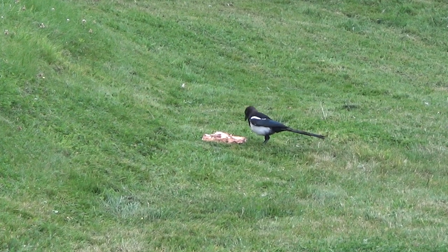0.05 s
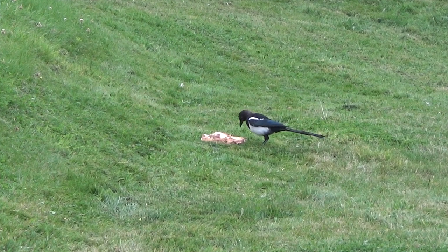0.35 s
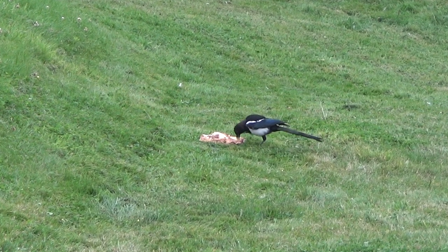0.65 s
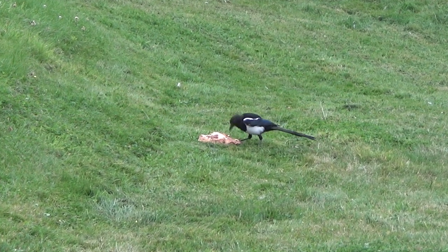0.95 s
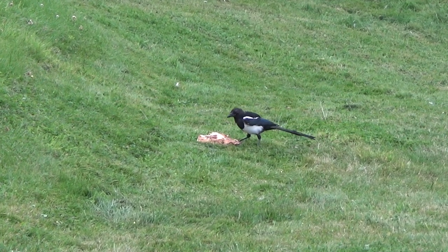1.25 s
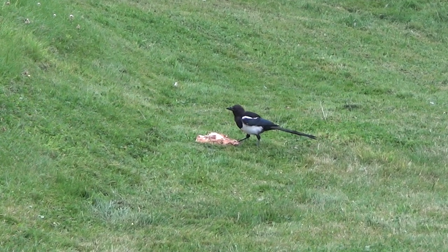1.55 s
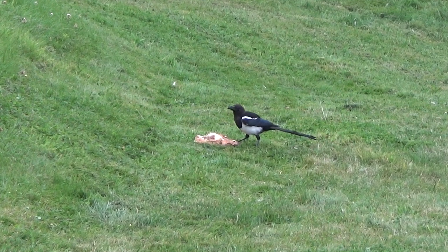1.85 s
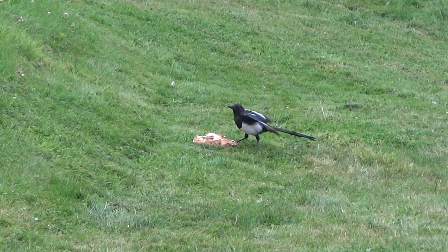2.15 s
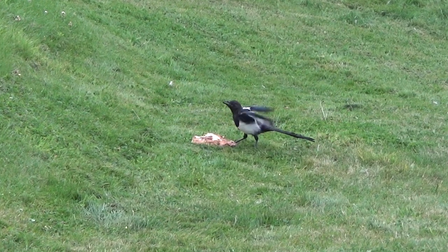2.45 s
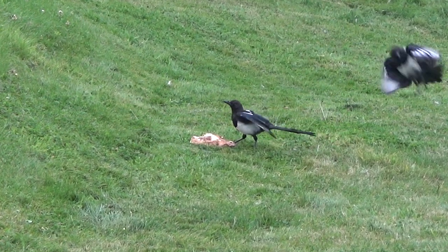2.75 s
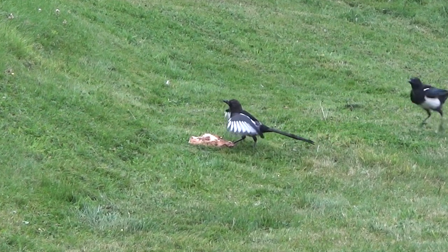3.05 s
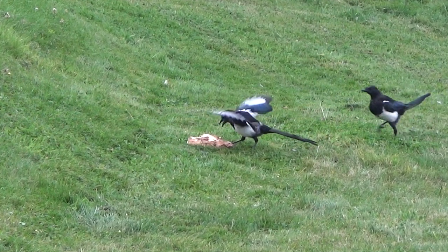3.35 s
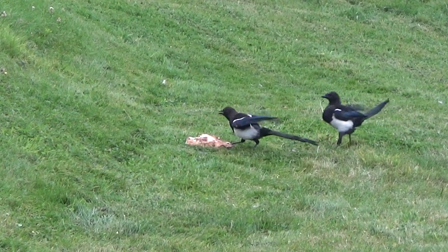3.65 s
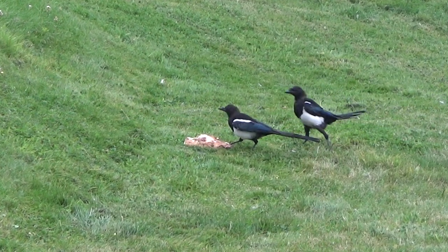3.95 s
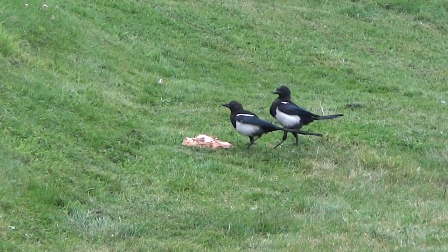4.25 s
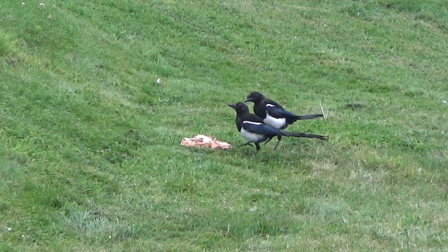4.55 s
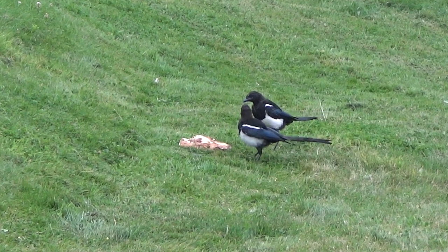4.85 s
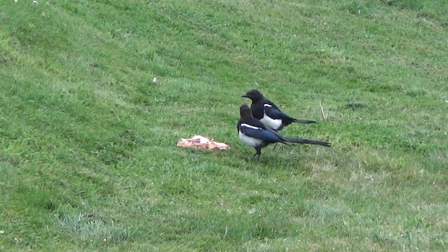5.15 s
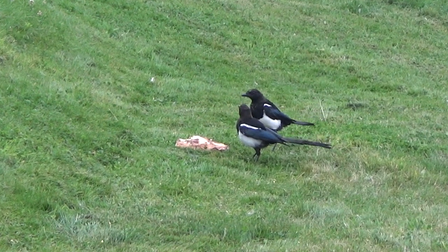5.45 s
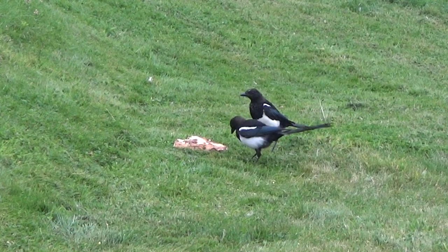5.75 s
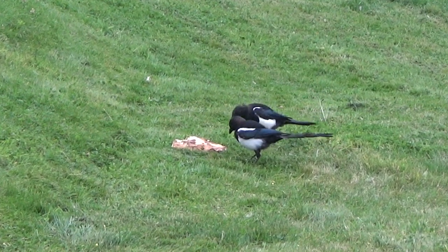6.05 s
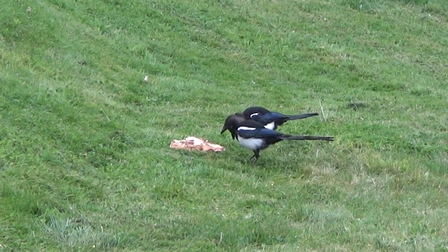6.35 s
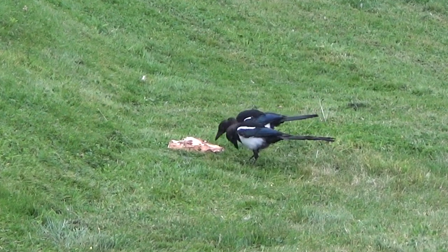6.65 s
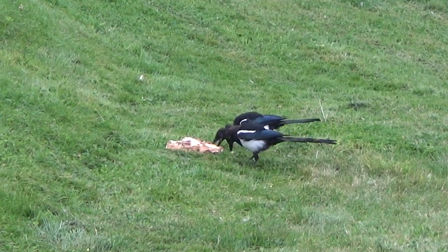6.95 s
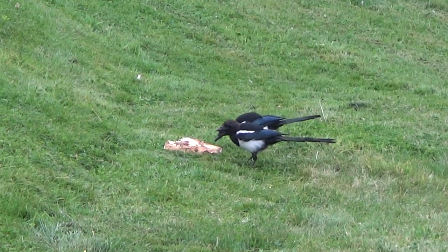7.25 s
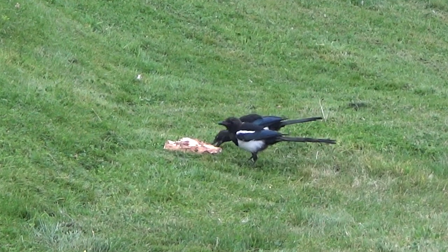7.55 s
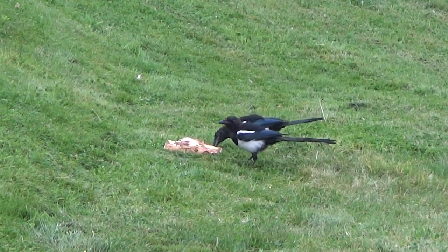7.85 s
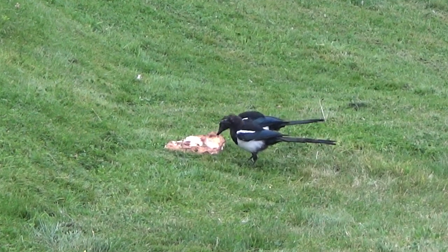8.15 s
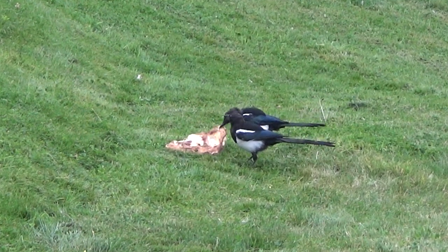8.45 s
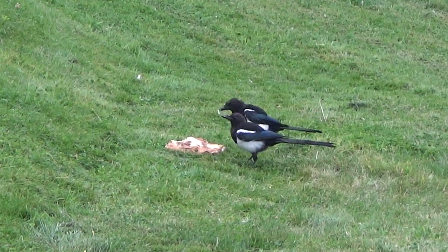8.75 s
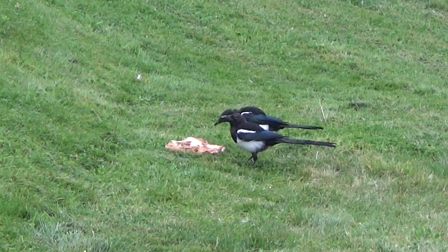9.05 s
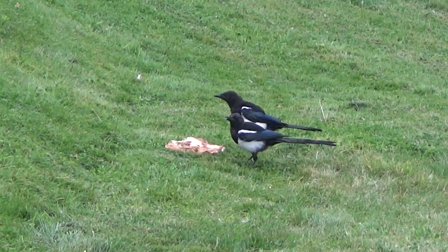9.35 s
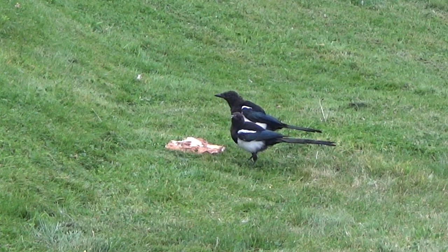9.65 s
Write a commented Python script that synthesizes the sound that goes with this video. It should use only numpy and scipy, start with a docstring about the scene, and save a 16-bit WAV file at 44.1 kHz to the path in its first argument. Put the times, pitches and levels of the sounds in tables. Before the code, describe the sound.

Harsh magpie rattles and hoarse yelps ring briefly off nearby walls, with a far songbird and steady road murmur behind.

```python
"""A lawn close to house walls, where two magpies squabble over food.
Up front are their short rising yelps and two bursts of harsh chatter: the syrinx sings or slaps shut,
throat and bill shape the sound, and it rings briefly between the walls.
Far off, a small songbird trills and whistles, and there is one soft hoot.
Under it all lies a steady bed of distant traffic, with two swells of deep engine drone."""
import sys
import numpy as np
from scipy import signal
from scipy.fft import rfft, irfft
from scipy.io import wavfile

SR = 44100
rng = np.random.default_rng(int(sys.argv[2]) if len(sys.argv) > 2 else 0)


def pcm_store(signal):
    """Save signal as 16-bit PCM."""
    levels = np.round(np.clip(np.atleast_2d(signal), -1, 1) * 32767)
    wavfile.write(sys.argv[1], SR, levels.astype(np.int16).T)


N = 432180
TIME = np.arange(N) / SR

# notes of the chatter: peak_s, level_db
CHATTER_NOTES = [(3.798, -26.3), (3.857, -22.7), (3.936, -22), (4.017, -21), (4.103, -23), (4.196, -23.3),
                 (7.300, -27), (7.363, -23.5), (7.446, -21.5), (7.527, -20.5), (7.603, -21), (7.695, -21.5),
                 (7.787, -19.5), (7.879, -19.5), (8.002, -18.5)]
# bursts of chatter: start_s, opening_low_mid_db
CHATTER_BURSTS = [(3.795, 3.9), (7.3, 1.3)]
# throat and open bill in the chatter: frequency_hz, gain_db
CHATTER_EQ = [(250, -40), (500, -26), (900, -18), (1400, -12.5), (1900, -6), (2400, -5.5), (2900, -0.5),
              (3400, -10.5), (4200, -19), (5000, -15.5), (6000, -6.5), (7100, -9), (9500, -14),
              (11000, -23.5), (15500, -41.5)]
# yelps: start_s, length_s, first_pitch_hz, level_db, fullness (0-1), rasp_db, first_throat_hz
YELP_CUES = [(.652, .078, 570, -25.5, .65, -12, 2200), (.783, .089, 515, -24, .35, -7, 2100),
             (.951, .081, 508, -22.8, .05, -8, 2080), (4.032, .063, 550, -25.7, .92, -5, 2150),
             (4.18, .064, 640, -23.6, .02, -5, 2550), (4.324, .088, 512, -27.2, .95, -6, 1480),
             (9.635, .064, 580, -25, 0.83, -4.5, 1820), (9.751, .09, 522, -27.5, .75, -4.8, 1880)]
# the clear part of a yelp: frequency_hz, gain_db
YELP_TONE_EQ = [(400, -38), (800, -14.5), (1300, -9), (1700, -8.5), (2200, 0.5), (2700, 4.5), (3400, -4),
                (3900, -28), (4800, -19), (7000, -8.5), (8300, -26), (11000, -50)]
# the hoarse part of a yelp: frequency_hz, gain_db
YELP_RASP_EQ = [(400, -28), (900, -20.5), (1600, -14.5), (2300, -1.5), (2900, -2), (3600, -5.5), (4700, 1),
                (6000, -6), (7400, -7.5), (8700, -18.5), (11000, -26), (15500, -41)]
# a thin and a full yelp: odd_harmonics_db, treble_db, low_mid_db
THIN_YELP, FULL_YELP = (-15, -1.8, -4.5), (-1.5, 4.5, 2.8)
# lean of the body of the magpies' sound, left positive: time_s, lean_db
MAGPIE_PAN = [(1, 0.3), (4, -1.4), (7.7, -2), (9.7, .6)]
# hard reflections off the walls: delay_s, gain_db
WALL_ECHOES = [(.0022, -16.5), (.0043, -18.5), (0.0205, -16.5)]
# standing waves between the walls: frequency_hz, gain_db
STANDING_WAVES = [(1151, -3), (1321, -12), (1373, -13), (1439, -17), (1847, -3.5), (2033, -4), (2233, -3),
                  (2346, -2), (2750, -10.5), (2803, -4), (2998, 2), (3207, -10), (5942, -1), (6061, -8),
                  (6401, -15), (6819, -1), (7114, -3)]
# stereo image of the wall scatter and the garden tail: frequency_hz, left_right_likeness
WALL_IMAGE = [(300, -0.046), (1500, 0.7), (3000, 0.8), (5000, 0.85), (9000, 0.52)]
GARDEN_IMAGE = [(500, 0.99), (3000, 0.64), (9000, 0.36)]
# songbird's trills: start_s, length_s, first_pitch_hz, last_pitch_hz, pips_per_s, level_db, fall_db
TRILL_CUES = [(4.474, 0.063, 4950, 4230, 55, -44.5, -4), (4.55, 0.18, 3700, 3250, 50, -45.5, -6),
              (5.986, 0.36, 5450, 3106, 48, -46.5, -8.5)]
# songbird's clearer slurs: start_s, length_s, first_pitch_hz, last_pitch_hz, level_db
SLUR_CUES = [(2.011, .11, 2370, 4330, -59), (2.07, .15, 4400, 2500, -59), (2.92, .066, 2360, 3020, -57),
             (5.368, .027, 4100, 3670, -59), (6.38, 0.055, 3100, 2250, -56), (6.76, .14, 2430, 2720, -61),
             (7.075, 0.042, 3330, 2550, -56), (7.13, .029, 6030, 3940, -50),
             (7.194, .028, 4900, 2690, -52.5), (8.633, 0.039, 2700, 2265, -54),
             (9.408, 0.083, 2650, 3910, -56)]
# raw traffic murmur, and the gentle EQ that warms it: frequency_hz, gain_db
TRAFFIC_SPECTRUM = [(15, -35), (25, -21), (48, -2.5), (178, -7.5), (246, -2), (322, -7), (468, -7.5),
                    (613, -9), (1110, -11), (2060, -16.5), (2550, -18), (3430, -23), (7880, -30.5),
                    (13900, -41.5), (15400, -58.5)]
TRAFFIC_EQ = [(25, -5), (60, -0.4), (110, 3.0), (1100, 0.37), (2200, -1.0), (12000, -1.0)]
# stereo image of the traffic: frequency_hz, left_right_likeness
TRAFFIC_IMAGE = [(60, 0.6), (130, 0.32), (290, -0.19), (640, -0.29), (1410, -0.049), (3100, -0.051),
                 (6810, -0.015), (15000, 0.15)]
# swells of engine drone: start_s, length_s, level_db
DRONE_SWELLS = [(1.65, 1.3, -62.5), (4.75, 0.83, -63)]


def chatter(swell_s=.023, fade_s=.0215, lead_s=.035, attack_s=.01, stretch_per_s=.7, thin_db_per_s=2.5):
    """Magpie notes of rasp swell, then fade as the air runs out; along a burst they lengthen and thin."""
    out, size = np.zeros(N), 8192
    t = (np.arange(size) - size // 2) / SR
    for peak_s, level_db in CHATTER_NOTES:
        burst_s, opening_db = min(CHATTER_BURSTS, key=lambda burst: abs(peak_s - burst[0]))
        note_time = t / (1 + stretch_per_s * (peak_s - burst_s))
        treble_db = 0.13 * (level_db + 19)   # softer notes come from a less open bill
        low_db = opening_db - thin_db_per_s * (peak_s - burst_s)
        pressure = np.exp(-np.abs(note_time / np.where(t < 0, swell_s, fade_s)) ** 1.82)
        pressure *= np.clip((note_time + lead_s) / attack_s, 0, 1)   # the voice catches
        source = colour(rasp(size, slaps_per_s=245, uneven=.33, puff_s=0.006, snap=0.54), CHATTER_EQ)
        bright = bill(source, treble_db, low_db)
        dull = colour(bright, [(3300, 2), (6000, -9.0)])
        voice = dull + pressure * (bright - dull)   # the treble needs full pressure
        add(out, peak_s + t[0], from_db(level_db) * pressure * voice)
    return out


def yelps(top_hz=890, open_throat_hz=3500, jitter=0.024, shimmer_db=1.6, focus_db=5, roughening_db=7):
    """A magpie's fast upward glide splits and turns to rasp; the throat's resonance rises with it."""
    out, size = np.zeros(N), 6000
    for start_s, length_s, first_hz, level_db, fullness, rasp_db, first_throat_hz in YELP_CUES:
        odd_db, treble_db, low_db = THIN_YELP + fullness * np.subtract(FULL_YELP, THIN_YELP)
        along = TIME[:size] / length_s
        risen = np.minimum(along, 1)
        pitch_hz = first_hz * (top_hz / first_hz) ** (risen ** 1.1)
        pitch_hz *= 1 + jitter * risen * wander(1091, size)
        throat_hz = first_throat_hz * (open_throat_hz / first_throat_hz) ** risen
        phase = 2 * np.pi * np.cumsum(pitch_hz) / SR
        tone = 0
        for k in range(1, 13):
            formant_db = focus_db * np.exp(-(np.log(k * pitch_hz / throat_hz) / 0.2) ** 2)
            gain = from_db(odd_db * (k % 2) + formant_db + shimmer_db * wander(515, size))
            tone += gain * np.sin(k * phase + rng.uniform(0, 2 * np.pi))
        tone *= 1 + 0.58 * risen ** 2 * np.sin(phase / 2)   # period doubling splits the partials
        tone = colour(tone, YELP_TONE_EQ)
        grit = colour(rasp(size, slaps_per_s=420, uneven=0.32, puff_s=0.0029, snap=0.35), YELP_RASP_EQ)
        grit = from_db(rasp_db + roughening_db * (risen - .5)) * rms_one(grit)
        source = tone / np.std(tone[along < 1]) + grit
        pressure = np.exp(-((along - 0.56) / 0.42) ** 2) * np.clip(along * 20, 0, 1)
        add(out, start_s, from_db(level_db) * pressure * bill(source, treble_db, low_db))
    return out


def rasp(size, slaps_per_s, uneven, puff_s, snap, spread_db=1.64, limp_db=2.0):
    """The syrinx slaps shut unevenly, strong and weak in turn: each time a click and a puff of air."""
    timing, force = rng.standard_normal((2, 200))
    at = (np.cumsum(np.exp(uneven * timing)) * SR / slaps_per_s).astype(int)
    strength = from_db(spread_db * force - limp_db * (np.arange(len(at)) % 2))
    slaps = np.zeros(size)
    slaps[at[at < size]] = strength[at < size]
    decay = np.exp(-1 / (puff_s * SR))
    puffs = signal.lfilter([np.sqrt(1 - decay ** 2)], [1, -decay], slaps + 1e-18)
    return snap * butter(slaps, 7400, "low") + puffs * rng.standard_normal(size)


def bill(source, treble_db, low_db):
    """A wider bill lets out more treble, a fuller throat more low-mid."""
    eq = [(1800, low_db), (2500, 0.0056), (3300, 0.0049), (5000, 0.76 * treble_db), (8500, 1.06 * treble_db)]
    return colour(rms_one(source), eq)


def walls(x):
    """Nearby walls add hard echoes, dense early scatter and ringing standing waves."""
    x = x + sum(from_db(db) * np.interp(TIME - delay_s, TIME, x, left=0) for delay_s, db in WALL_ECHOES)
    early = scatter(x, t60_s=0.22, image=WALL_IMAGE, dull_hz=13200, build_s=0.00056)
    x = from_db(-4.5) * x + from_db(-12.0) * early
    return x + sum(from_db(db) * resonance(x, hz, width_hz=11.6) for hz, db in STANDING_WAVES)


def trills(sag=3.2, pip_s=0.0053, pip_sweep=0.12, uneven_db=2.5):
    """The songbird's runs of tiny down-swept pips, sinking in pitch and level."""
    out = np.zeros(N)
    for start_s, length_s, first_hz, last_hz, pips_per_s, level_db, fall_db in TRILL_CUES:
        for delay_s in np.arange(0, length_s, 1 / pips_per_s):
            height = np.exp(-sag * delay_s / length_s)
            hz = (last_hz + (first_hz - last_hz) * height) * rng.normal(1, 0.027)
            sweep = 1.02 + pip_sweep * height
            gain = from_db(level_db + fall_db * delay_s / length_s + uneven_db * rng.normal())
            add(out, start_s + delay_s, gain * whistle(pip_s, hz * sweep, hz / sweep, waver=0.014))
    return out


def slurs(cues, air_cutoff_hz=7500):
    """Far slurred whistles with an air-dulled octave; wider sweeps are brighter and less steady."""
    out = np.zeros(N)
    for start_s, length_s, first_hz, last_hz, level_db in cues:
        sweep_octaves = abs(np.log2(last_hz / first_hz))
        waver = 0.0125 * (.3 + 9 * sweep_octaves)
        octave = butter(whistle(length_s, 2 * first_hz, 2 * last_hz, waver), air_cutoff_hz, "low")
        octave *= from_db(-5) * min(2 * sweep_octaves, 1)
        add(out, start_s, from_db(level_db) * (whistle(length_s, first_hz, last_hz, waver) + octave))
    return out


def twitter_cues(per_s=4, typical_s=0.055, centre_hz=3700, spread_octaves=0.78, level_db=-68):
    """Cues for faint random slurs that fill in behind the songbird."""
    cues = []
    for when, height, tilt, span in rng.random((round(per_s * N / SR), 4)):
        first_hz = centre_hz * 2 ** (spread_octaves * (2 * height - 1))
        last_hz = first_hz * 2 ** (.4 * (2 * tilt - 1))
        cues.append((when * N / SR, typical_s * (.5 + span), first_hz, last_hz, level_db))
    return cues


def hoot(start_s=7.66):
    """One soft, hoarse, rising hoot from far away."""
    out = np.zeros(N)
    add(out, start_s, from_db(-46.5) * whistle(length_s=.17, first_hz=350, last_hz=420, waver=0.09))
    return out


def garden(x):
    """The longer, duller tail from hedges and houses."""
    return scatter(x, t60_s=0.57, image=GARDEN_IMAGE, dull_hz=6600, build_s=.012)


def traffic(drone_hz=49, ramp_s=0.25):
    """A wide bed of road murmur, with a deep engine drone that comes and goes."""
    murmur = rms_one(colour(stereo_noise(TRAFFIC_IMAGE, N), TRAFFIC_SPECTRUM))
    murmur = colour(murmur, TRAFFIC_EQ)
    drone = rms_one(np.sin(2 * np.pi * np.cumsum(drone_hz + 4 * wander(25, N)) / SR))
    swells = sum(from_db(db) * np.clip(np.minimum(TIME - start_s, start_s + length_s - TIME) / ramp_s, 0, 1)
                 for start_s, length_s, db in DRONE_SWELLS)
    return from_db(-54.8 + .5 * wander(5.5, N)) * murmur + swells * drone


def whistle(length_s, first_hz, last_hz, waver):
    """One gliding sine with soft ends."""
    size = SR // 4
    along = np.minimum(TIME[:size] / length_s, 1)
    pitch_hz = first_hz * (last_hz / first_hz) ** along * (1 + waver * wander(383, size))
    return np.sin(np.pi * along) * np.sin(2 * np.pi * np.cumsum(pitch_hz) / SR)


def scatter(x, t60_s, image, dull_hz, build_s):
    """Reverb: a cloud of reflections that builds up and dies away."""
    t = TIME[:SR]
    cloud = butter(stereo_noise(image, SR), dull_hz, "low")
    cloud *= from_db(-60 * t / t60_s) * (1 - np.exp(-t / build_s))
    cloud /= np.sqrt(np.sum(cloud ** 2) / 2)
    return signal.fftconvolve(x[None], cloud, axes=1)[:, :N]


def stereo_noise(image, size):
    """Mid-side noise with a given left-right likeness at each frequency."""
    alike = np.clip(at_bins(image, size), -.99, .99)
    mid, side = rfft(rng.standard_normal((2, size)))
    return irfft(np.sqrt(1 + alike) * mid + np.sqrt(1 - alike) * side * [[1], [-1]], size)


def colour(x, eq):
    """Apply a smooth EQ curve."""
    size = x.shape[-1]
    return irfft(rfft(x) * from_db(at_bins(eq, size)), size)


def at_bins(points, size):
    """A curve over log frequency, read at each FFT bin."""
    hz, value = np.transpose(points)
    return np.interp(np.log(np.fft.rfftfreq(size, 1 / SR) + 1), np.log(hz), value)


def butter(x, hz, kind):
    """A second-order filter."""
    return signal.sosfilt(signal.butter(2, hz, kind, fs=SR, output="sos"), x)


def resonance(x, hz, width_hz):
    """One resonance with unity gain at its peak."""
    r = np.exp(-np.pi * width_hz / SR)
    poles = [1, -2 * r * np.cos(2 * np.pi * hz / SR), r * r]
    return signal.lfilter(np.array([1, 0, -1]) * (1 - r * r) / 2, poles, x + 1e-18)


def wander(rate_hz, size):
    """Smooth random modulation with a spread near 1."""
    return np.interp(np.arange(size) * rate_hz / SR, np.arange(size), rng.standard_normal(size))


def from_db(db):
    """Decibels to gain."""
    return 10 ** (np.asarray(db) / 20)


def rms_one(x):
    """Scale to unit power."""
    return x / np.sqrt(np.mean(x ** 2) + 1e-20)


def add(out, start_s, sound):
    """Mix a sound in at its cue."""
    at = max(round(start_s * SR), 0)
    out[at:at + len(sound)] += sound[:max(N - at, 0)]


def scene():
    """Magpies up front, songbird far back, traffic all round."""
    rattles, cries, pips = chatter(), yelps(), trills()
    far = slurs(SLUR_CUES + twitter_cues()) + hoot()
    sides = np.array([[.5], [-.5]])
    pan_db = np.interp(TIME, *np.transpose(MAGPIE_PAN))
    magpies = walls(rattles + cries)
    body = colour(magpies, [(3000, 3.0), (8000, -12)])   # the treble stays near the centre
    magpies += body * (from_db(pan_db * sides) - 1)
    send = from_db(-17.5) * rattles + from_db(-28) * cries + from_db(-9.5) * pips + from_db(-7.5) * far
    birds = magpies + from_db(-3.5) * pips + from_db(-4.5) * far
    return birds + garden(send) + traffic() * from_db(-.9 * sides)


def record(dry, cutoff_hz=15300):
    """A steep high cut on the whole mix."""
    return signal.sosfilt(signal.ellip(10, .1, 80, cutoff_hz, fs=SR, output="sos"), dry)


dry = scene()
out = record(dry)
pcm_store(out)
```